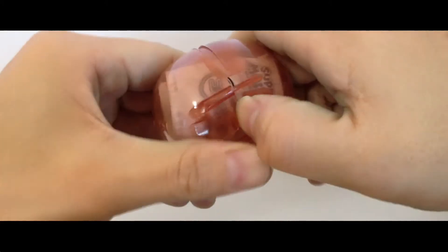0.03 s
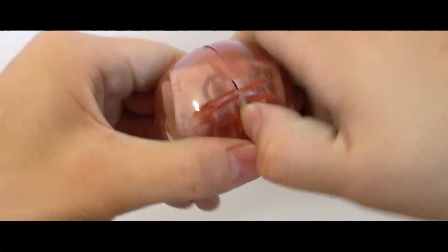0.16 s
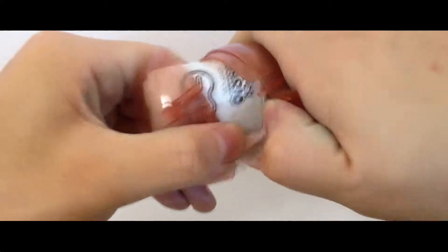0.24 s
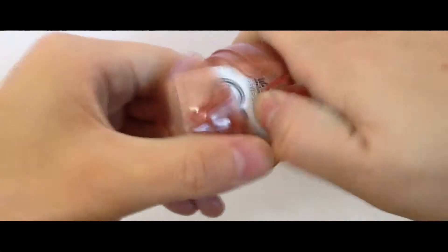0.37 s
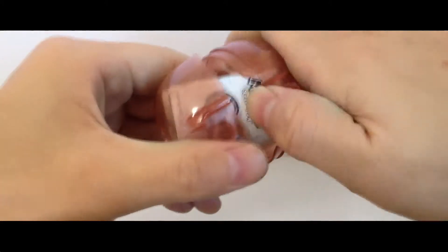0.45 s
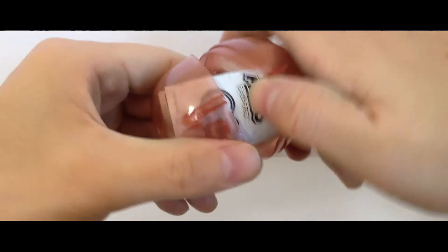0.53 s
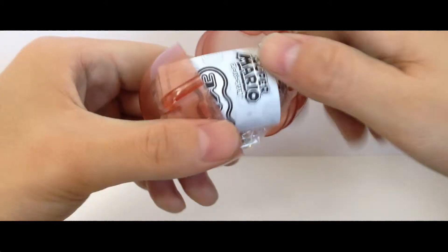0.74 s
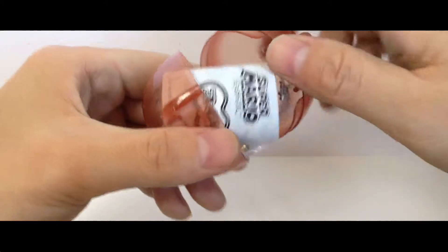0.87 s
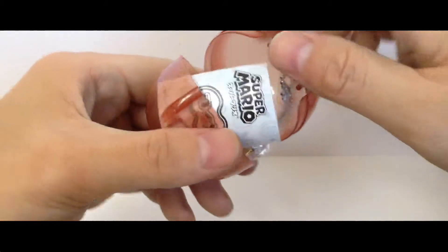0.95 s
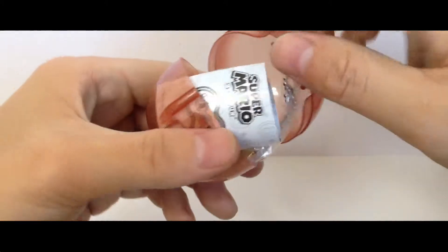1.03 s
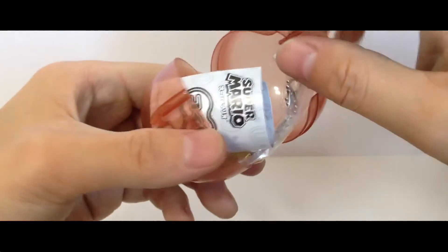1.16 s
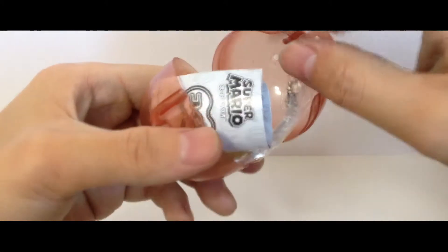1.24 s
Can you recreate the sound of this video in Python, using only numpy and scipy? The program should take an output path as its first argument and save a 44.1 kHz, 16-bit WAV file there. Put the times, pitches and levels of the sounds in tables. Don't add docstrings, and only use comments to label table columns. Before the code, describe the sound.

A small hollow plastic capsule pops open with a sharp, bright crack, then faint handling ticks

```python
import sys
import numpy as np
from scipy import signal
from scipy.fft import rfft, irfft
from scipy.io import wavfile

SR = 44100
rng = np.random.default_rng(int(sys.argv[2]) if len(sys.argv) > 2 else 0)


def materialize(psi):
    bounded = np.clip(np.atleast_2d(psi).T, -1, 1)
    quanta = np.round(bounded * 32767).astype(np.int16)
    wavfile.write(sys.argv[1], SR, quanta)


def to_linear_factor(level_db):
    exponent = np.asarray(level_db, float) / 20
    return 10 ** exponent


N = 57330

# start in seconds, knock on the shell in dB, bright crack in dB.
SEAM_CRACKS = [(0.2034, -22, -29), (0.2045, -9.5, -1), (.2060, -30.5, -8.5), (.2071, -4, -10.5),
               (.2080, -33, -6.5), (0.209, -19, -13.5), (0.21, -29, -11.5), (0.2142, -30, -21),
               (.2136, -22.5, -20.5), (.2162, -30, -20.5), (0.2211, -33.5, -23)]
# frequency in Hz, level in dB, t60 in seconds.
SHELL_MODES = [(349.3, -26.5, 0.034), (719, -16, .035), (1018, -6.5, .035), (1480, -2.5, 0.098),
               (2030, -5, .03), (2890, -5, .018), (4680, -7.5, .014)]
# frequency in Hz, density in dB per Hz.
CRACK_COLOUR = [(2000, -14.5), (4000, -9.5), (5000, -2.5), (6300, -4), (8000, 2.5), (10500, -9.5),
                (13000, -3.5), (16000, -13)]
CRACK_T60_S, CRACK_NOISE_DB = 0.0059, -5.5
GRIP_S, GRIP_DB, GRIP_TAKES_S = .2107, -9.5, 0.00025
# start in seconds, ring in dB, ring in Hz, snap in dB, snap in Hz.
FINGER_TAPS = [(.1000, -60.5, 910, -58.5, 3370), (0.1662, -53, 814, -59.5, 3470),
               (0.193, -44.5, 960, -47, 4860), (.3560, -54, 780, -50, 6030),
               (.4050, -58, 1550, -48.5, 7850), (0.4057, -75, 1550, -56, 14000),
               (.4190, -57.5, 1500, -56.5, 5500), (.4795, -47.5, 1390, -55.5, 4530),
               (.5400, -65.5, 1450, -65, 9000), (.6150, -63.5, 1550, -62, 4350),
               (0.6391, -59, 1550, -59.5, 4000), (0.6555, -55, 1492, -62, 4000),
               (0.6663, -43, 1400, -44.5, 4500), (0.667, -51, 2000, -63, 6300),
               (.7430, -60, 1550, -70, 4000), (.8900, -64, 1900, -58.5, 5000),
               (.9400, -62, 1611, -65.5, 4500), (1.061, -66, 1900, -63, 7000),
               (1.116, -71, 1900, -61, 7800), (1.161, -56.5, 1970, -63.5, 4000),
               (1.2298, -46.5, 1958, -57.5, 4484), (1.2296, -53.5, 2670, -63.5, 6534)]
TAP_T60_S, SNAP_T60_S, SNAP_OCTAVES = 0.0099, 0.011, 0.27
# time in seconds, level in dB.
CREAK_LEVEL = [
    (.075, -82),
    (.088, -61.5),
    (.11, -64),
    (.135, -67),
    (.165, -61),
    (.185, -59.5),
    (.195, -52.5),
    (.2, -57),
    (.204, -45),
    (.21, -89.5),
]
CREAK_HZ, CREAK_WIDTH_HZ, CREAK_SLIPS_PER_S, CREAK_BRIGHT_DB = 920, 160, 2800, -8.5
# time in seconds, level in dB.
SLIDE_LEVEL = [(0, -81.5), (.4, -76.5), (.52, -79), (.57, -84), (.62, -79.5), (.67, -65), (.72, -78.5),
               (.86, -74.5), (.89, -71), (.945, -80.5), (.96, -89), (1.03, -90), (1.06, -84), (1.12, -85),
               (1.16, -76), (1.22, -84), (1.3, -76)]
# frequency in Hz, width in Hz, level in dB.
SLIDE_RESONANCES = [(1550, 83, -0.5), (1950.5, 250, -0.5), (4200, 360, -3), (5020, 500, -7),
                    (7800, 1200, -8)]
SLIDE_GRAINS_PER_S = 830
# start in seconds, level in dB.
PALM_BUMPS = [
    (0.356, -49.5),
    (.359, -44),
    (.365, -45),
    (.409, -53),
    (0.682, -51.5),
]
# frequency in Hz, level in dB, t60 in seconds.
PALM_MODES = [(185, -2, 0.039), (304, -8, 0.018), (470, -1, 0.033), (720, -0.5, 0.017), (1000, -8, 0.037)]
# frequency in Hz, level in dB, t60 in seconds.
ROOM_DECAY = [(150, -14.5, .6), (350, -11, .45), (520, -17, .4), (1460, -2, .36), (2620, -11.5, 0.4),
              (4000, -13, .36), (7300, -7.5, .32), (10500, -19.5, 0.22), (15000, -18, 0.15)]
ROOM_DB, FIRST_WALL_S, BUILD_S = -16.5, 0.0069, 0.0017
FAR_WALL_S, FAR_WALL_DB, FAR_WALL_SPREAD_S, FAR_WALL_ABOVE_HZ = .114, 10.5, 0.0059, 11000
SHELL_LOW_CUT_HZ = 170
# time in seconds, level in dB.
RUMBLE_LEVEL = [(0, -66), (.08, -64.5), (.2, -63), (.21, -54), (.3, -67.5), (.35, -60), (.365, -52.5),
                (.42, -62.5), (.47, -66), (.63, -69.5), (.67, -56), (.8, -58), (.94, -61.5), (.97, -65),
                (1.06, -64), (1.3, -69)]
# frequency in Hz, density in dB per Hz.
RUMBLE_COLOUR = [(18, -73.5), (30, -42), (75, -22.5), (108, -3.5), (214, -1), (297, -11.5), (347, -12),
                 (900, -34.5), (1170, -62.5), (1980, -120)]
# frequency in Hz, density in dB per Hz.
HISS_COLOUR = [(260, -31.5), (450, -2.5), (998, -5), (1620, -4.5), (2420, -5), (9820, -15), (14700, -13),
               (16400, -22.5)]
HISS_DB = -71
TOP_HZ = 16000


def rms_one(x):
    return x / np.sqrt(np.mean(x ** 2) + 1e-20)


def in_time(rows):
    s, db = np.transpose(rows)
    return to_linear_factor(np.interp(np.arange(N) / SR, s, db))


def at_hz(points, hz, axis=1):
    points = np.array(points)
    return np.interp(np.log(hz), np.log(points[:, 0]), points[:, axis])


def coloured_noise(spectrum):
    hz = np.maximum(np.arange(N // 2 + 1) * SR / N, 1)
    white = rng.standard_normal(N)
    return rms_one(irfft(rfft(white) * to_linear_factor(at_hz(spectrum, hz)), N))


def band_pass(x, edges):
    return signal.sosfilt(signal.butter(2, edges, "band", fs=SR, output="sos"), x)


def ring(clicks, hz, t60):
    r, w = to_linear_factor(-60 / (t60 * SR)), 2 * np.pi * hz / SR
    return signal.lfilter([0, np.sin(w)], [1, -2 * r * np.cos(w), r * r], clicks + 1e-18)


def resonance(x, hz, width_hz):
    r = np.exp(-np.pi * width_hz / SR)
    poles = [1, -2 * r * np.cos(2 * np.pi * hz / SR), r * r]
    return signal.lfilter([(1 - r * r) / 2, 0, (r * r - 1) / 2], poles, x)


def narrow_peak(x, hz, width_hz):
    return rms_one(resonance(resonance(x, hz, width_hz), hz, 2 * width_hz))


def grains(per_s, uneven_db):
    sizes = to_linear_factor(uneven_db * np.minimum(rng.exponential(1, N), 4)) * rng.choice([-1, 1], N)
    return sizes * (rng.random(N) < per_s / SR)


def dying(s, t60):
    t = np.arange(N) / SR - s
    return (t >= 0) * to_linear_factor(-60 * np.maximum(t, 0) / t60)


def smooth_step(t, takes_s):
    return 1 / (1 + np.exp(-np.clip(t / takes_s, -50, 50)))


def strike(times, levels_db, modes, uneven_db):
    luck = rng.standard_normal((len(times), len(modes)))
    out = np.zeros(N)
    for k, (hz, db, t60) in enumerate(modes):
        clicks = np.zeros(N)
        sign = (-1) ** k
        clicks[(times * SR).astype(int)] = to_linear_factor(levels_db + db + uneven_db * luck[:, k]) * sign
        out += ring(clicks, hz, t60)
    return out


def seam_pop():
    s, knock_db, crack_db = np.transpose(SEAM_CRACKS)
    grip = to_linear_factor(GRIP_DB * smooth_step(np.arange(N) / SR - GRIP_S, GRIP_TAKES_S))
    knocks = strike(s, knock_db, SHELL_MODES, uneven_db=3.5)
    bursts = sum(to_linear_factor(db) * dying(start, CRACK_T60_S) for start, db in zip(s, crack_db))
    noise = coloured_noise([(500, -41)] + list(CRACK_COLOUR)) * to_linear_factor(CRACK_NOISE_DB)
    return grip * knocks + bursts * noise


def finger_taps():
    out, white = np.zeros(N), rng.standard_normal(N)
    for s, ring_db, ring_hz, snap_db, snap_hz in FINGER_TAPS:
        click = np.zeros(N)
        click[int(s * SR)] = to_linear_factor(ring_db)
        soft = resonance(click, ring_hz, ring_hz) / np.sin(np.pi * ring_hz / SR) / 4
        edges = np.minimum(snap_hz * 2 ** np.array([-SNAP_OCTAVES, SNAP_OCTAVES]), [15000, 16000])
        snap = band_pass(white * dying(s, SNAP_T60_S), edges)
        even = np.sqrt(SR / 2 / (edges[1] - edges[0]))
        out += ring(soft, ring_hz, TAP_T60_S) + to_linear_factor(snap_db) * snap * even
    return out


def shell_creak():
    slips = grains(CREAK_SLIPS_PER_S, uneven_db=2.5)
    low = narrow_peak(slips, CREAK_HZ, CREAK_WIDTH_HZ)
    bright = to_linear_factor(CREAK_BRIGHT_DB) * rms_one(resonance(slips, 3000, 3500))
    return in_time(CREAK_LEVEL) * (low + bright)


def finger_slide():
    skin = grains(SLIDE_GRAINS_PER_S, uneven_db=1.0)
    shell = sum(to_linear_factor(db) * narrow_peak(skin, hz, width) for hz, width, db in SLIDE_RESONANCES)
    return in_time(SLIDE_LEVEL) * shell


def palm_bumps():
    s, db = np.transpose(PALM_BUMPS)
    return signal.lfilter([.2], [1, -.8], strike(s, db, PALM_MODES, uneven_db=3.5))


def room_answer():
    t = np.arange(N) / SR - SEAM_CRACKS[1][0]
    white = rng.standard_normal((2, N))
    far = to_linear_factor(FAR_WALL_DB) * np.exp(-((t - FAR_WALL_S) / FAR_WALL_SPREAD_S) ** 2)
    tail = np.zeros(N)
    for k, low in enumerate(100 * 2 ** np.arange(0, 7.4, .5)):
        band = band_pass(white[k % 2], [low, low * np.sqrt(2)])
        hz = low * 2 ** .25
        fall_db = 60 * np.maximum(t, 0) / at_hz(ROOM_DECAY, hz, axis=2)
        echo = 1 + far * hz / (hz + FAR_WALL_ABOVE_HZ)
        tail += band * to_linear_factor(at_hz(ROOM_DECAY, hz) - fall_db) * echo
    return to_linear_factor(ROOM_DB) * tail * (t > 0) * smooth_step(t - FIRST_WALL_S, BUILD_S)


def handling_rumble():
    return in_time(RUMBLE_LEVEL) * coloured_noise(RUMBLE_COLOUR)


def microphone_hiss():
    return to_linear_factor(HISS_DB) * coloured_noise(HISS_COLOUR)


def scene():
    capsule = seam_pop() + finger_taps() + shell_creak() + finger_slide() + palm_bumps() + room_answer()
    low_cut = signal.butter(4, SHELL_LOW_CUT_HZ, "high", fs=SR, output="sos")
    capsule = signal.sosfilt(low_cut, capsule)
    return (capsule + handling_rumble() + microphone_hiss())[None]


def band_limit(x):
    return signal.sosfilt(signal.butter(12, 16520, fs=SR, output="sos"), x)


def record(dry):
    top_cut = signal.cheby2(10, 60, TOP_HZ + 500, fs=SR, output="sos")
    mix = np.clip(signal.sosfilt(top_cut, dry), -.99, .99)
    return band_limit(mix)


dry = scene()
out = record(dry)
materialize(out)
```